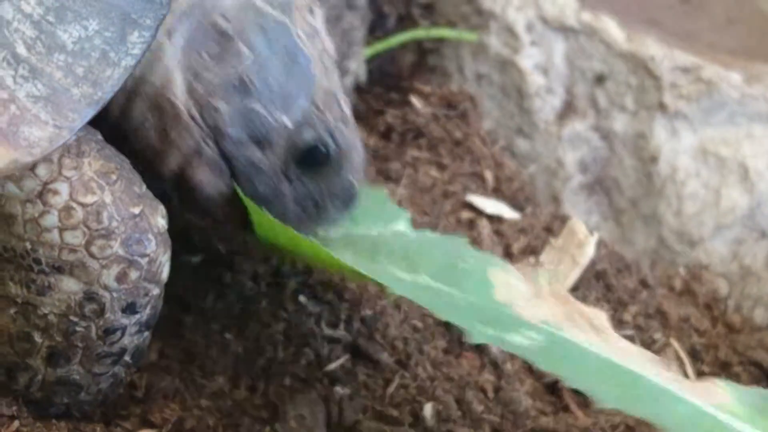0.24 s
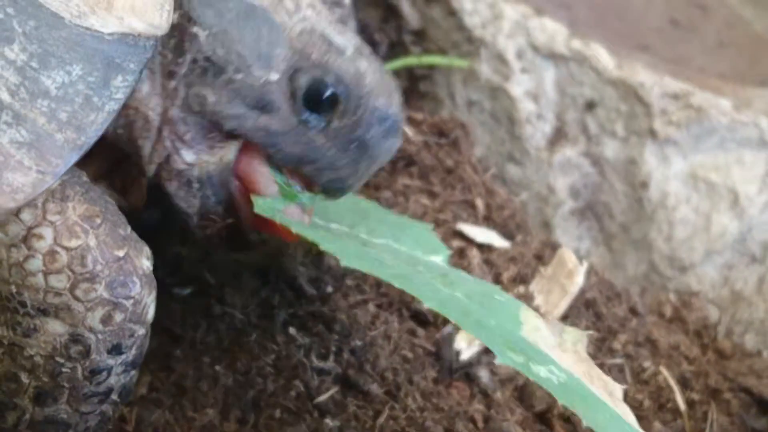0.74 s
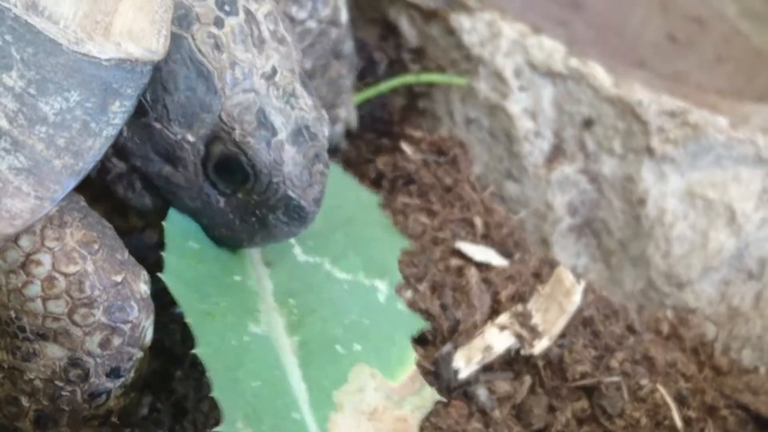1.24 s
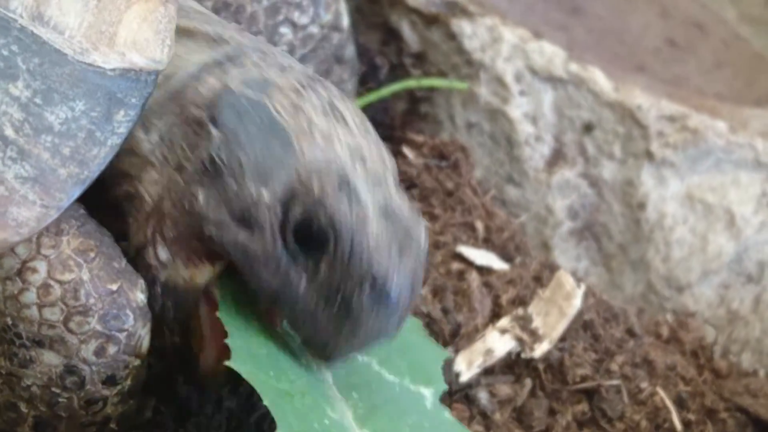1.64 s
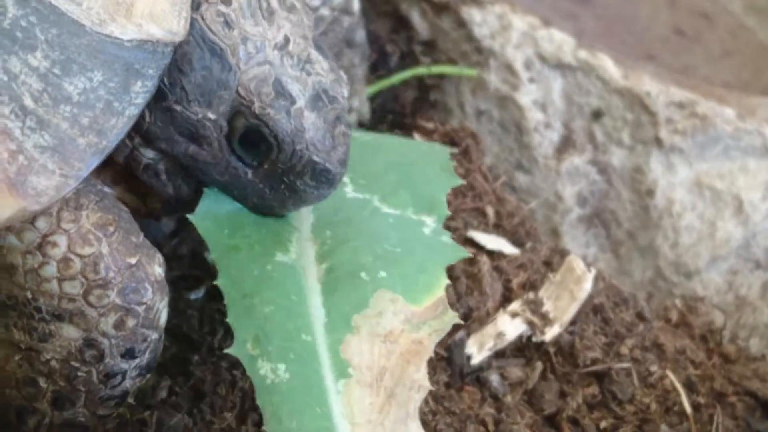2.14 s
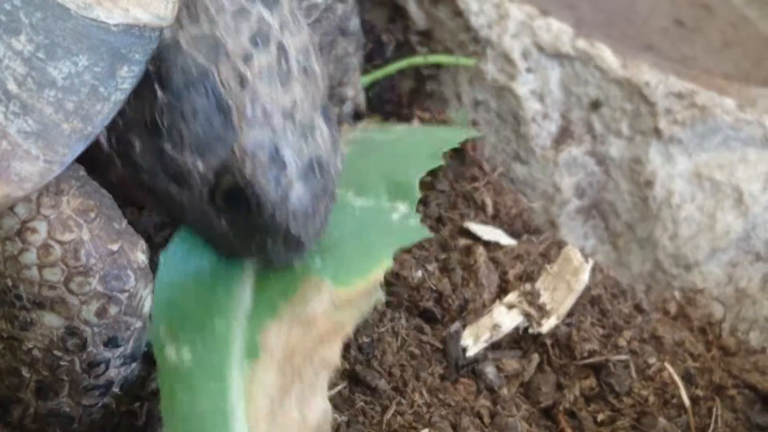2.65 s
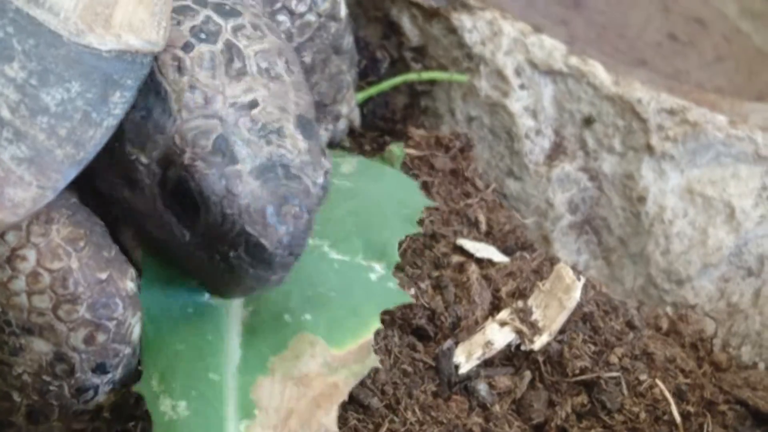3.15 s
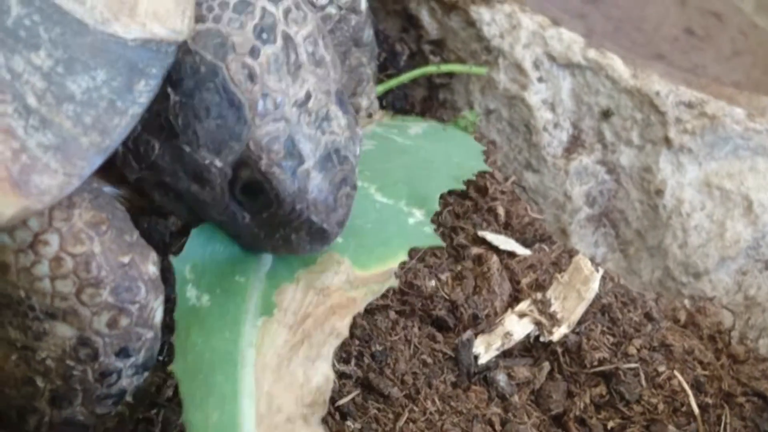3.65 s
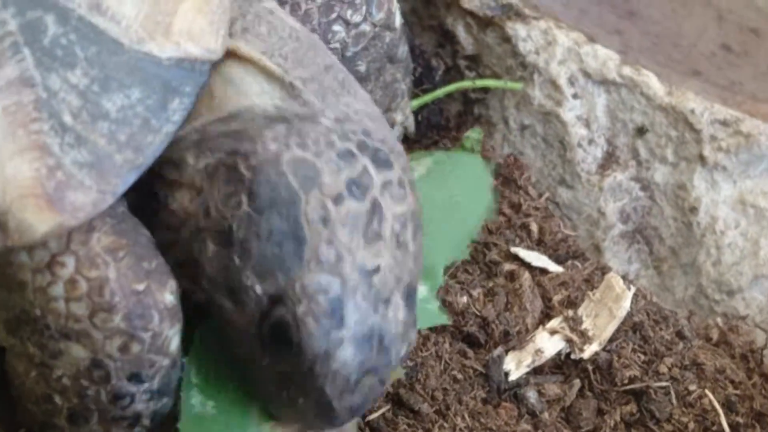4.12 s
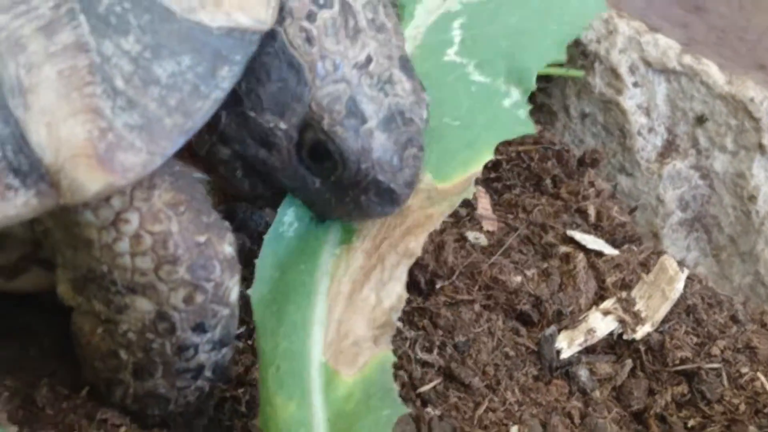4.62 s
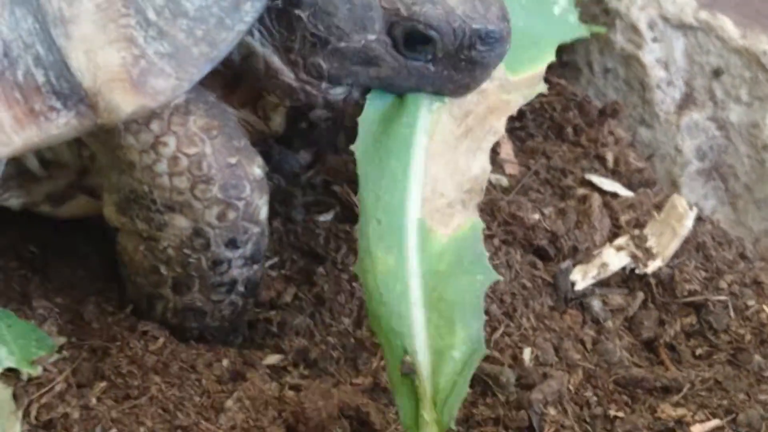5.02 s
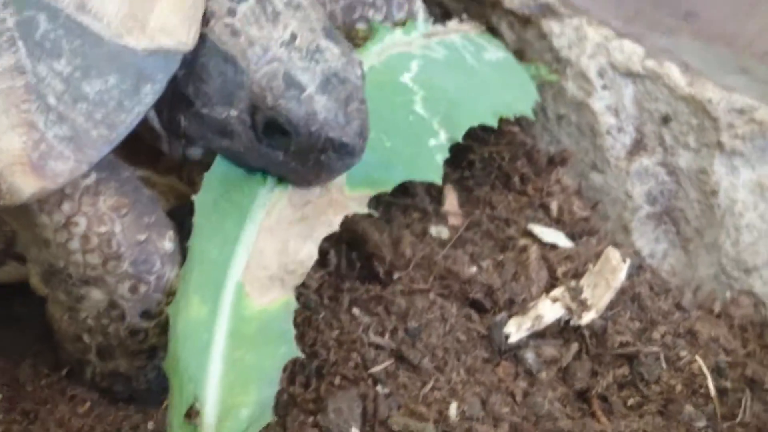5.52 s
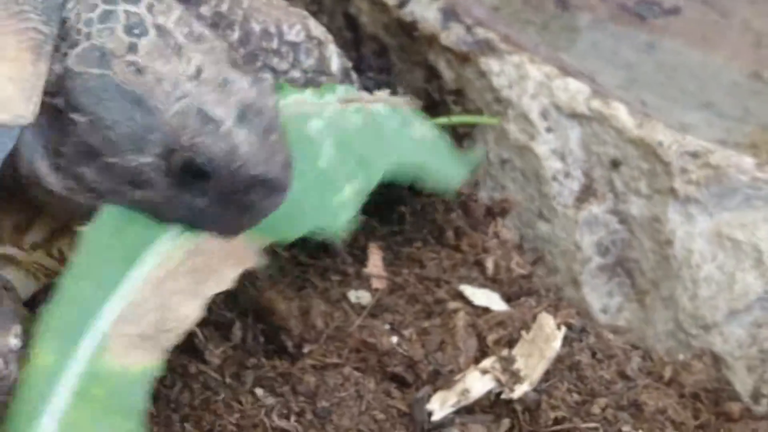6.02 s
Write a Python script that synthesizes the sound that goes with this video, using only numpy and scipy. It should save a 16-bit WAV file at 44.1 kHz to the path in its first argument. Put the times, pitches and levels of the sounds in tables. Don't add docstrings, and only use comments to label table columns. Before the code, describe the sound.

Very close to the microphone, a tortoise bites a crisp leaf in separate bursts: bright clicks, thin snapping veins and short fizzy rips, with sparse ticks between. A small stone-walled pen adds a very brief tail. Behind lies deep traffic rumble, light hiss, faint bird whistles early on, and later a vehicle revving and slowing.

```python
import sys
import numpy as np
from scipy import signal
from scipy.fft import rfft, irfft, next_fast_len
from scipy.io import wavfile
from scipy.ndimage import uniform_filter1d

SR = 44100
rng = np.random.default_rng(int(sys.argv[2]) if len(sys.argv) > 2 else 0)


def rack_gain(trim_db):
    fader = np.asarray(trim_db, float)
    return 10 ** (fader / 20)


def pcm_store(signal):
    levels = np.round(np.clip(np.atleast_2d(signal), -1, 1) * 32767)
    wavfile.write(sys.argv[1], SR, levels.astype(np.int16).T)


N = 276507

# time in seconds, peak in dB, loudest pitch
# in Hz, brightness in dB.
VEINS = [(0.3086, -32, 11900, 12), (1.0619, -33, 9600, 0.5), (1.8116, -39.5, 4570, -8),
         (1.8414, -30.5, 10900, -3), (2.651, -31.5, 9150, 1), (2.6552, -36, 9300, -4),
         (2.6652, -33.5, 9000, 1), (2.706, -37, 6000, 0), (2.718, -33, 7160, -6), (2.7311, -41, 6000, -2),
         (3.0304, -35.5, 8900, -7), (3.491, -31, 10900, 2), (3.494, -39, 14500, 21),
         (3.4976, -21.5, 6200, -0.5), (3.5197, -32, 10700, -5), (3.606, -33, 11800, -1.5),
         (4.2812, -33, 10900, 10), (4.2928, -31, 10900, -1), (4.3011, -27.5, 10900, 0),
         (4.3093, -28, 6000, -5), (4.317, -27, 6200, 1), (4.3337, -30.5, 6000, -2), (4.3675, -30, 8100, 1),
         (5.0914, -30, 14600, 14), (5.1414, -37, 9000, 14), (5.1943, -16.5, 6000, 3),
         (5.2102, -32, 9890, 10), (5.256, -31, 9300, -1), (6.0041, -29.5, 9100, -8),
         (6.0422, -34.5, 5300, 1),
         (0.1454, -43, 9200, 9), (0.143, -45, 5470, 0), (0.2683, -49, 9000, 2),
              (0.3837, -52, 5740, -9), (1.797, -45, 9200, 3), (1.859, -57, 9000, 4), (3.572, -48, 6200, 13),
              (3.298, -50, 4473, -16), (3.222, -39.5, 9200, 5), (3.146, -44, 5500, -4),
              (5.7626, -49.5, 8830, 8), (5.8007, -61, 8500, 8), (5.821, -51, 12500, 14),
              (0.241, -39, 5460, -4), (0.3136, -45, 11700, 0), (1.1139, -36, 6000, -1),
              (1.1252, -43, 11860, 17), (1.8279, -38, 9330, -4), (1.9207, -37.5, 6900, -4),
              (1.926, -38, 11400, -5), (2.624, -39.5, 9200, -5), (3.037, -46, 9600, -13),
              (3.052, -44, 4200, -15), (3.1414, -42, 10700, 14), (3.201, -40, 9700, 15),
              (3.281, -34.5, 4930, 0.5), (3.4844, -39, 12170, 11), (3.915, -37.5, 6000, -1),
              (3.966, -42, 4600, 1), (3.9821, -36, 9400, -2), (4.2736, -41, 9500, 9), (4.289, -32, 6150, 2),
              (4.3865, -37, 10800, -11), (5.0885, -37, 9060, 14), (5.0997, -38, 10200, 14),
              (5.107, -35, 9200, 16), (5.135, -41, 9000, 11), (5.166, -40, 9000, -10),
              (5.27, -37, 9250, -6), (6.0002, -38, 8900, -6), (6.022, -39, 8800, -1),
              (6.093, -39.5, 8700, -6)]
# time in seconds, peak in dB,
# loudest pitch in Hz.
TICKS = [(0.0886, -49, 5900), (0.6611, -50, 8900), (0.7132, -43, 4500), (0.7471, -46, 10200),
         (0.7856, -45.5, 4180), (0.9583, -42.5, 9600), (0.9951, -48, 4690), (1.0963, -45, 8800),
         (1.54, -43, 10700), (1.6307, -49.5, 9070), (2.0168, -46.5, 8900), (2.034, -47, 4370),
         (2.349, -46, 9300), (2.921, -42.5, 5462), (3.0925, -40.5, 5060), (3.33, -46.5, 4441),
         (3.4063, -46, 9600), (3.4211, -41.5, 8370), (3.8326, -47.5, 4330), (3.9043, -47, 4150),
         (4.0005, -42, 6000), (4.447, -42, 9300), (4.8932, -47, 9400), (5.246, -41, 10200),
         (5.334, -46, 9200), (5.42, -47, 8900), (5.7357, -47, 8600), (5.083, -42, 12100),
         (0.0912, -47, 5080), (0.1103, -45, 5000), (0.1513, -47, 8790), (0.3256, -48, 8790),
             (0.3344, -47, 11540), (1.0365, -43, 4200), (1.057, -49, 9300), (1.1168, -48, 5860),
             (1.1195, -49, 8610), (1.1289, -43, 4080), (1.1399, -42, 9050), (1.9026, -48, 5510),
             (1.9304, -38, 10510), (1.9376, -50, 15420), (2.5911, -50, 5940), (2.6617, -39, 9390),
             (2.6728, -41, 11630), (2.7368, -42, 6030), (2.9628, -50, 5360), (3.0502, -48, 8870),
             (3.0957, -56, 4900), (3.1286, -54, 6370), (3.1635, -43, 4620), (3.1684, -52, 9390),
             (3.4458, -51, 6030), (3.4565, -51, 10700), (3.4645, -45, 11970), (3.4679, -52, 9390),
             (3.4756, -50, 10700), (3.9074, -50, 4740), (3.9223, -43, 7020), (3.9644, -48, 4954),
             (4.2592, -52, 9650), (4.2642, -51, 10620), (4.2766, -46, 10750), (4.3128, -32, 9470),
             (4.4242, -52, 9300), (5.125, -44, 10000), (5.2289, -47, 10340), (5.2532, -49, 9220),
             (5.3503, -42, 9200), (5.3529, -54, 5510), (5.9923, -42, 8870), (6.1374, -59, 8300),
             (6.2369, -56, 8700)]
# peak time in seconds, tearing level in dB, dying time in
# seconds, brightness in dB.
RIPS = [(0.243, -51, 0.078, 4), (.312, -67, .05, -8), (.717, -67, 0.065, -8), (1.063, -63, .011, 5),
        (1.121, -54, 0.08, -2), (2.715, -56.5, 0.068, -5), (2.91, -63, 0.22, -12), (3.036, -62, 0.18, -9),
        (3.094, -55, 0.031, -2), (3.229, -60.5, 0.11, 1), (3.499, -52, 0.094, 7.5), (3.92, -58, 0.017, -9),
        (3.975, -46.5, 0.026, -2), (4.311, -51, 0.076, -4), (4.42, -58.5, 0.12, -3), (4.742, -61, 0.38, -8),
        (5.087, -55, 0.091, 9), (5.141, -53.5, 0.18, 6.5), (5.2, -45.5, 0.033, -8), (5.225, -64, 0.74, -15),
        (5.8, -69, 0.042, 7), (1.812, -66, .015, -3), (6.004, -63.5, 0.23, 2), (6.103, -56.5, 0.059, 6.5)]
# peak time in seconds, tearing level in dB, build-up in
# seconds, brightness in dB.
PULLS = [(.147, -61, 0.19, -1), (.345, -53, 0.15, -5), (.395, -58, 0.045, -1), (.195, -58.5, 0.02, 0.5),
         (1.839, -61, 0.063, 5), (1.929, -53, 0.039, 1.5), (2.661, -62.5, 0.26, 1), (3.223, -59, 0.57, -1),
         (3.484, -66, 0.037, 14), (3.575, -50.5, 0.17, 0), (4.095, -60, 0.12, -3), (4.286, -56.5, 0.027, 4),
         (4.402, -52.5, 0.17, 3), (5.997, -65, 0.1, 3), (6.239, -59, 0.022, 3.5), (2.674, -61, .02, 1),
         (2.711, -61, 0.013, 5), (1.842, -61, 0.0085, -5)]
# start in seconds, length in seconds,
# pitch in Hz, dB over the tearing.
SINGING = [(0.1, 0.061, 9100, -7), (0.226, 0.23, 9400, -20), (1.04, .03, 9300, -3), (1.143, .08, 4700, -6),
           (1.894, 0.031, 5600, -5), (2.638, .04, 9250, 3), (2.699, 0.066, 6130, 6.5),
           (3.02, .27, 9000, -7), (3.043, .2, 4600, -18), (3.45, 0.13, 10900, -4),
           (3.517, 0.051, 4940, -23), (3.532, .05, 8500, -9), (4.257, 0.14, 10900, -7),
           (4.282, 0.13, 6000, -3), (4.381, .04, 4900, -12), (5.07, 0.18, 9600, -3), (6.08, .07, 8900, -11)]
# frequency in Hz, left in dB, right in dB.
LEAF = [(600, -43.5, -43.5), (980, -27, -14.5), (2400, -14.5, -17), (3020, -21, -14), (3430, -5.5, -6.5),
        (3580, -9, -3.5), (4800, -11.5, -2), (6000, -5.5, -3.5), (7300, -3.5, -5.5), (7970, -6.5, -5),
        (8700, -3.5, 6.5), (9500, -3, 3), (10800, -8.5, 0), (11900, -5, 0), (17700, -14.5, 0.5)]
# time in seconds, peak in dB, pitch in Hz.
KNOCKS = [(0.241, -66, 1490), (1.842, -64.5, 1060), (1.92, -64, 887.5), (2.655, -68, 980),
          (2.715, -65, 2236), (3.03, -85, 929), (3.518, -75, 1810), (3.551, -62.5, 1040),
          (4.302, -59.5, 1530), (5.195, -53.5, 1160), (5.208, -63, 1492), (5.255, -61, 1370),
          (6.0, -58.5, 1140), (6.005, -76, 1040), (6.042, -59.5, 1070)]
# time in seconds, peak in dB, pitch
# in Hz.
SCUFFS = [(2.408, -77, 676), (2.428, -83, 810), (2.478, -85, 850), (2.86, -79, 480), (2.94, -82, 520),
          (2.445, -80, 650), (2.464, -74, 490), (2.493, -78.5, 630), (2.713, -77, 389.6), (2.878, -80, 600),
          (2.895, -75, 493), (2.917, -79, 645), (2.965, -80, 600), (5.728, -72, 2110)]
# time in seconds, engine firing rate in Hz, load level in dB.
REV = [(4.4, 45.76, -63), (4.567, 52.36, -41.5), (4.648, 58.3, -39.5), (4.717, 58.3, -57),
       (4.768, 57.5, -46), (4.916, 61.93, -56), (5.002, 64.6, -49), (5.122, 61.4, -46), (5.25, 64.7, -53)]
# time in seconds, engine firing rate in Hz, load level in dB.
SLOW = [(5.229, 61.9, -63), (5.319, 56.7, -39), (5.504, 56.6, -43), (5.606, 52.74, -33.5),
        (5.706, 48.65, -38.5), (5.801, 45.8, -58), (5.9, 44, -80), (5.95, 41.2, -76)]
# time in seconds, engine firing rate in Hz, load level in dB.
IDLE = [(0.441, 60.9, -42), (.9, 64.03, -70), (1.5, 64.4, -57.5), (2.0, 61.72, -62.5), (2.45, 59.25, -63),
        (2.7, 65, -53), (3.3, 65.63, -57), (3.75, 62.33, -56.5), (4.0, 60.85, -51), (4.25, 60.5, -49),
        (4.379, 60, -63)]
# level in dB at a load of -45 dB, share of the load it follows,
# speed waver as a share.
SECOND = [
    (-56.5, 1, 0.021),
    (-51, 0.038, 0.022),
]
IDLE_SECOND = (-68.5, 1, 0.03)
# time in seconds, pitch in Hz, level in dB.
HUMS = [
    [(0, 134.4, -57), (.35, 131.6, -85), (.7, 132.8, -67), (.9, 135, -59.5), (1.1, 135.1, -66),
     (1.4, 134.9, -58), (1.9, 135, -63.5), (2.2, 135.3, -70.5), (2.5, 133.4, -62), (2.85, 137.7, -73)],
    [(4.25, 69.8, -68), (4.4, 71.9, -64), (4.52, 77, -51), (4.62, 89.7, -57), (4.7, 97, -61)],
    [(5.5, 165, -71), (5.7, 144, -61), (5.85, 140, -69)],
    [(1.2, 90, -75), (2.1, 92, -66), (2.5, 88, -73), (3.4, 87, -61), (4.2, 85, -68)],
    [(5.7, 57.4, -51), (5.82, 63.3, -52), (5.97, 60.3, -44)],
    [(5.88, 82.3, -58), (6.0, 80, -42.5), (6.15, 75.4, -60.5), (6.27, 76.1, -51)],
    [(0, 49.4, -35), (.1, 52.6, -52), (.36, 51.6, -46.5), (.46, 51.3, -61)],
]
# time in seconds, level in dB.
TRAFFIC = [(0, -51.5), (.5, -51), (0.901, -56), (1.4, -58.5), (2.1, -59.5), (2.42, -54), (2.56, -59.5),
           (2.679, -54.5), (3.3, -54), (3.75, -60), (4.2, -52), (4.45, -52.5), (5.2, -49), (5.8, -49.5),
           (6.27, -45)]
# frequency in Hz, level in dB per Hz.
RUMBLE = [(15, -46), (25, -61), (39, -13), (59, 17), (107, -8), (140, -24), (161, -9), (220, -19),
          (290, -57), (480, -120)]
# frequency in Hz, level in dB per Hz.
ROAR = [(59, -37.5), (100, -4), (182, -18), (284, -14.5), (376, -23), (494, -23.5), (573, -30.5),
        (964, -39.5), (1500, -40.5), (1950, -98), (3300, -120)]
# start in seconds, length in seconds, start pitch in Hz, end pitch in Hz, level in dB.
BIRD = [
    (1.392, 0.115, 3230, 3000, -80.5),
    (1.768, 0.085, 3390, 3130, -78),
    (1.946, 0.045, 3230, 3040, -78),
    (2.105, .075, 3570, 3420, -82),
    (2.172, 0.095, 3350, 3250, -80),
    (2.33, 0.032, 3870, 3850, -72),
]
# frequency in Hz, level in dB per Hz.
HISS = [(410, -18.5), (700, 0.5), (865, -7), (1450, -9), (1740, -6.5), (2550, -7), (3240, -4.5), (5940, -3),
        (7050, -7), (7730, -12.5), (9300, -2.5), (11200, -11.5), (15200, -13), (15800, -17.5), (16400, -73)]
# frequency in Hz, likeness from 0 to 1.
SAME = [(50, 0.94), (130, 0.9), (260, 1), (550, 0.17), (1500, 0.065), (5000, 0.01)]
# frequency in Hz, left minus right in dB.
SIDE_DB = [(60, -1.5), (130, -10.5), (290, -5), (640, -1), (1410, -1.5), (3100, -4), (6820, -6), (15000, 0)]

CRACK_RISE_S, CRACK_S = 0.00021, 0.00057
CRACKLE_S, CRACKLE_SHARE = 0.0043, 0.14
TICK_BRIGHT_DB, BRIGHT_DB_PER_OCTAVE = -4.5, 4
RIP_RISE_S, PULL_DROP_S = 0.011, 0.017
TEAR_DELAY_S = 0.00052
STEP_DB = 15
ROUNDING = 1.35
SING_WIDTH_HZ = 390
PORT_LAG_SAMPLES = 8
BASS_TURN_RAD = 0.42
ROAR_DB, ROAR_FOLLOWS = -63, 0.37


def snaps():
    hz, t, out = np.fft.rfftfreq(1024, 1 / SR), np.arange(512) / SR, np.zeros((2, N))
    breaks = [*VEINS, *ticks()]
    chance = rng.standard_normal((len(breaks), 2, len(t)))
    force = np.clip((np.array(breaks)[:, 1:2] + 46) / 14, 0, 1)
    chance[:, :, 9] += 3.5 * force * np.sign(chance[:, :, 9])
    fading = np.exp(-t / CRACK_S) + CRACKLE_SHARE * np.exp(-t / CRACKLE_S)
    shape = (1 - np.exp(-t / CRACK_RISE_S)) * fading
    z = rfft(chance * shape, 1024)
    cracks = irfft(z / uniform_filter1d(abs(z), size=21))[..., :len(t)]
    for (s, db, ring_hz, bright_db), (a, b) in zip(breaks, cracks):
        colour_db = leaf_colour(hz, ring_hz, ring_db=7.0, width=.11) + brightened(hz, bright_db - 2.5)
        crack = signal.fftconvolve(ports(a, b, alike=.75), causal(colour_db)[:, :256], axes=1)
        loudness = np.sqrt(np.mean(abs(signal.hilbert(crack)).max(1) ** 2))
        add(out, s, rack_gain(db) * crack / loudness)
    return out


def ticks():
    rows = []
    for s, db, hz in TICKS:
        rows.append((s, db, hz, TICK_BRIGHT_DB + BRIGHT_DB_PER_OCTAVE * np.log2(hz / 5000)))
    return rows


def tearing():
    hz, cells = np.fft.rfftfreq(1024, 1 / SR), np.zeros((2, N))
    for ring_hz in (4350, 4800, 6200, 8900, 9600, 10900):
        size = rack_gain(3.4 * rng.exponential(1, (2, N)).clip(0, 3.2)) * rng.standard_normal((2, N))
        turn = rack_gain(3.8 * evened(uniform_filter1d(rng.standard_normal(N), size=500)))
        bursting = rng.random((2, N)) < 1800 / SR
        bursts = ports(*(size * turn * bursting), alike=.55)
        patch = causal(leaf_colour(hz, ring_hz, ring_db=10.0, width=.07))[:, :256]
        cells += signal.oaconvolve(bursts, patch, axes=1)[:, :N]
    dull = signal.oaconvolve(cells, signal.firwin(65, 8000, fs=SR)[None], "same")
    bright = cells - dull
    effort, shine = strain()
    fizz = evened(dull) * effort + evened(bright) * shine
    return rack_gain(-7.0) * (fizz + singing(cells, np.minimum(effort, 2 * shine)))


def strain():
    effort, shine = np.zeros((2, N))
    t = np.arange(N) / SR - TEAR_DELAY_S
    rips = [(s, db, RIP_RISE_S, dying, bright) for s, db, dying, bright in RIPS]
    pulls = [(s, db, build, PULL_DROP_S, bright) for s, db, build, bright in PULLS]
    for s, db, rise, fall, bright_db in rips + pulls:
        near = slice(max(round((s - 2 * rise) * SR), 0), round((s + 2 * fall) * SR))
        steps = np.maximum((s - t[near]) / rise, (t[near] - s) / fall)
        power = rack_gain(2 * (db - STEP_DB * steps ** ROUNDING))
        effort[near] += power
        shine[near] += power * rack_gain(2 * bright_db)
    return np.sqrt(effort), np.sqrt(shine)


def singing(cells, level):
    out = np.zeros((2, N))
    for s, length, hz, db in SINGING:
        near = slice(round(s * SR), round((s + length) * SR))
        ring = signal.lfilter(*signal.iirpeak(hz, hz / SING_WIDTH_HZ, fs=SR), cells[:, near])
        out[:, near] += rack_gain(db) * evened(ring) * level[near] * signal.windows.tukey(ring.shape[1], .3)
    return out


def leaf_colour(hz, ring_hz, ring_db, width):
    f, left, right = np.transpose(LEAF)
    ring = ring_db * np.exp(-(np.log(hz / ring_hz + 1e-9) / width) ** 2)
    return np.array([np.interp(np.log(hz + 1), np.log(f), db) for db in (left, right)]) + ring


def brightened(hz, bright_db):
    return bright_db * (1 / (1 + np.exp((8000 - hz) / 500)) - .5)


def ports(near, other, alike):
    alike = np.clip(alike, 0, 1)
    return np.array([near, alike * np.roll(near, PORT_LAG_SAMPLES) + np.sqrt(1 - alike ** 2) * other])


def knocks(table, cycles, rough, overtone):
    out = np.zeros((2, N))
    for (s, db, hz), puff in zip(table, rng.standard_normal((len(table), 2, 1500))):
        turns = np.arange(1500) / SR * hz
        puff = signal.lfilter(*signal.butter(2, [.55 * hz, 1.6 * hz], "band", fs=SR), puff)
        modes = np.sin(2 * np.pi * turns) + overtone * np.sin(2 * np.pi * 1.2 * turns)
        blow = modes + rough * evened(puff)
        add(out, s, rack_gain(db) * blow * (1 - np.exp(-turns / (0.021 * cycles))) * np.exp(-turns / cycles))
    return out * rack_gain([[-1.5], [1.5]])


def pen(x):
    t = np.arange(3000) / SR
    taps = rng.choice([-1., 1.], (2, len(t))) * (rng.random((2, len(t))) < .12) * (t > .0012)
    tail = taps * rack_gain(-60 * t / 0.029)
    return signal.oaconvolve(x, tail / np.linalg.norm(tail, axis=1, keepdims=True), axes=1)[:, :N]


def engines():
    out = np.zeros(N)
    for rows, second in zip([REV, SLOW, IDLE], [*SECOND, IDLE_SECOND]):
        low_tone(out, rows, *second)
    return out * rack_gain([[-1.7], [1.5]])


def hums():
    out = np.zeros(N)
    for rows in HUMS:
        low_tone(out, rows, second_db=-120, follows=0, waver=.004)
    return out * rack_gain([[-1.7], [1.5]])


def low_tone(mix, rows, second_db, follows, waver):
    s, (hz, load_db) = curves(rows)
    hz = hz * (1 + waver * evened(uniform_filter1d(rng.standard_normal(len(hz)), size=2500)))
    turns, edge = np.cumsum(hz) / SR, np.arange(len(hz))
    orders = -rack_gain(load_db) * np.cos(2 * np.pi * turns)
    orders += rack_gain(second_db + follows * (load_db + 45)) * np.sin(4 * np.pi * turns)
    fade = np.clip(np.minimum(edge + (s == 0) * N, edge[::-1]) / 2000, 0, 1)
    add(mix, s, np.sqrt(2) * orders * fade)


def traffic():
    loud_db = np.interp(np.arange(N) / SR, *np.transpose(TRAFFIC))
    rumble = noise(RUMBLE, size=4096, patchy_db=-0.5) * rack_gain(loud_db)
    return rumble + noise(ROAR, size=2048, patchy_db=1.5) * rack_gain(ROAR_DB + ROAR_FOLLOWS * (loud_db + 55))


def turned(x):
    half_turn = np.exp([[-.5j * BASS_TURN_RAD], [.5j * BASS_TURN_RAD]])
    return (signal.hilbert(x, next_fast_len(N))[:, :N] * half_turn).real


def bird():
    out = np.zeros(N)
    for s, length, start_hz, end_hz, db in BIRD:
        hz = np.linspace(start_hz, end_hz, int(length * SR))
        waver, flutter = uniform_filter1d(rng.standard_normal((2, len(hz))), size=300)
        hz = hz + 18 * evened(waver)
        level = rack_gain(db - 2.5 + 2 * evened(flutter))
        whistle = np.sqrt(2) * np.sin(2 * np.pi * np.cumsum(hz) / SR)
        add(out, s, level * whistle * signal.windows.tukey(len(hz), .35))
    return out * rack_gain([[-3.0], [2.5]])


def hiss():
    return rack_gain(-71) * noise(HISS, size=512, patchy_db=1.6)


def noise(colour, size, patchy_db):
    frames, hz = 4 * N // size + 9, np.fft.rfftfreq(size, 1 / SR)
    a, b, c, d, patches = rng.standard_normal((frames, len(hz), 5)).T
    patches = evened(uniform_filter1d(uniform_filter1d(patches, size=12, axis=0), size=10, axis=1))
    same = np.clip(read(SAME, hz), -1, 1)[:, None]
    left = a + 1j * b
    z = np.array([left, same * left + np.sqrt(1 - same ** 2) * (c + 1j * d)])
    z *= rack_gain(read(colour, hz)[:, None] + patchy_db * patches)
    z *= rack_gain(np.outer([.5, -.5], read(SIDE_DB, hz)))[..., None]
    out = signal.istft(z, nperseg=size, noverlap=3 * size // 4)[1][:, size:N + size]
    return out / np.sqrt(np.mean(out.mean(0) ** 2))


def evened(x):
    return x / np.sqrt(np.mean(x ** 2) + 1e-20)


def read(points, hz):
    f, value = np.transpose(points)
    return np.interp(np.log(hz + 1), np.log(f + 1), value)


def curves(rows):
    s, *columns = np.transpose(rows)
    t = np.arange(s[0], s[-1], 1 / SR)
    return s[0], [np.interp(t, s, c) for c in columns]


def add(mix, s, sound):
    part = mix[..., round(s * SR):][..., :sound.shape[-1]]
    part += sound[..., :part.shape[-1]]


def causal(db):
    cepstrum = irfft(np.maximum(db, -100) * np.log(10) / 20)
    middle = cepstrum.shape[-1] // 2
    cepstrum[..., 1:middle] *= 2
    cepstrum[..., middle + 1:] = 0
    return irfft(np.exp(rfft(cepstrum)))


def scene():
    leaf = snaps() + tearing()
    leaf += knocks(KNOCKS, cycles=1.7, rough=0.76, overtone=1.0)
    leaf += knocks(SCUFFS, cycles=10.6, rough=3.1, overtone=0)
    road = turned(traffic() + engines() + hums())
    return leaf + rack_gain(-12.5) * pen(leaf) + road + bird() + hiss()


def top_cut(x):
    return signal.sosfilt(signal.butter(12, 16690, fs=SR, output="sos"), x)


def record(dry):
    x = signal.sosfiltfilt(signal.butter(2, 40.0, "high", fs=SR, output="sos"), dry, padtype="even")
    x = signal.oaconvolve(x, signal.firwin(255, 15900., window=("kaiser", 5), fs=SR)[None], "same")
    return top_cut(x - .0011)


dry = scene()
out = record(dry)
pcm_store(out)
```